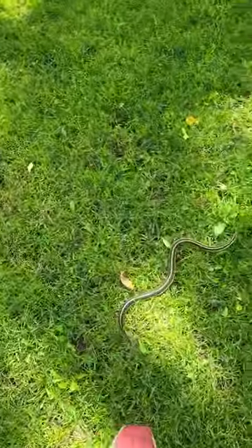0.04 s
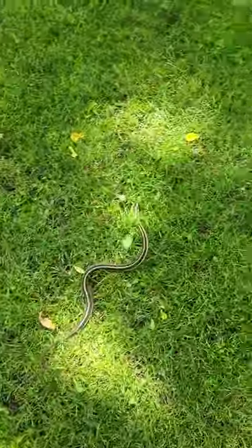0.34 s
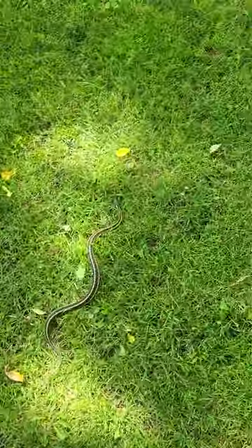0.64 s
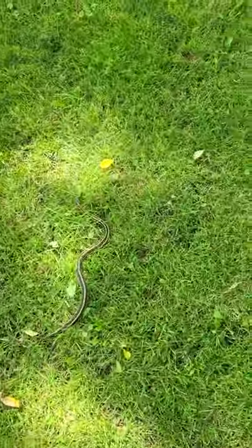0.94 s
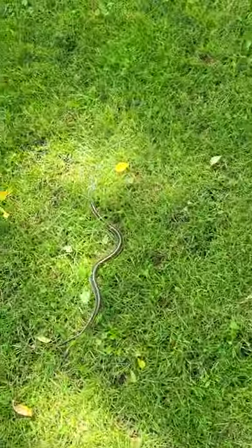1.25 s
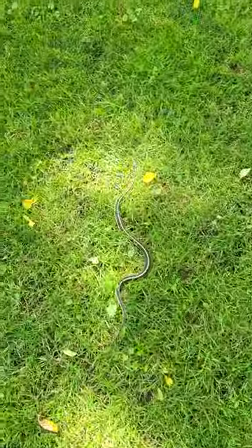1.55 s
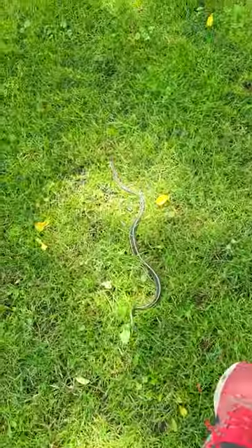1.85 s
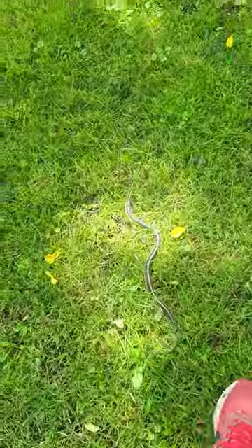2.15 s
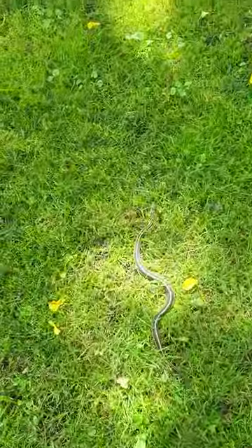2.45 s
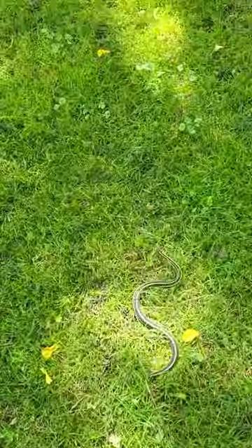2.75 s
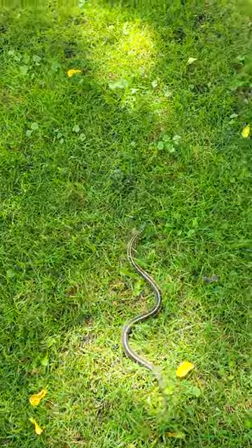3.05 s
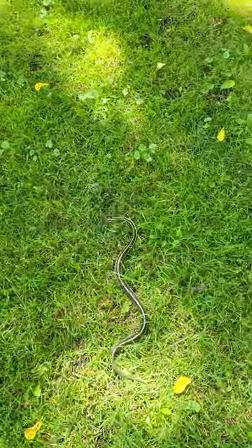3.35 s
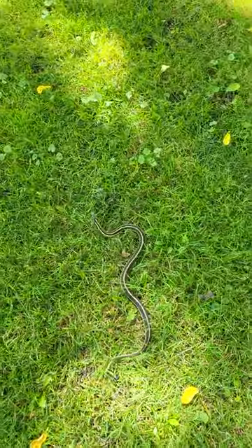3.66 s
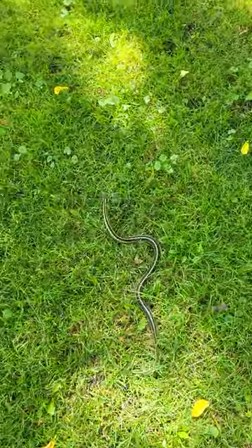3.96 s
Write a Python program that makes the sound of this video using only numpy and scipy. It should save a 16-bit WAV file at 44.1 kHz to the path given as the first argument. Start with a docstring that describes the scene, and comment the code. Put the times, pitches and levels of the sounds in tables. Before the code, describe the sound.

A snake rustles softly through short grass outdoors, followed by light swishing footsteps and snapping stalks. Low wind buffets the microphone, with one sharp tap early on. Faint birds chirp as the slither dies away.

```python
"""A snake slides through short grass, followed on soft steps by someone holding a camera.
From the start wind buffets mainly the left microphone port, over a far outdoor wash and a brief hiss.
Shoes swish through the blades and snap dry stalks; at 0.19 s one sharp tap rings the camera's body.
Faint birds call, then leaves crackle, turf crunches and two twigs crack underfoot. A low hoot follows.
The wash keeps fading, and the slither dies away under a last cluster of calls."""
import sys
import numpy as np
from scipy import signal
from scipy.fft import rfft, irfft, next_fast_len
from scipy.io import wavfile
from scipy.ndimage import uniform_filter1d, map_coordinates

SR = 44100
rng = np.random.default_rng(int(sys.argv[2]) if len(sys.argv) > 2 else 0)


def dump_mix(stems):
    """Bounce the given channels to the path in sys.argv[1] as a 16-bit WAV at rate SR."""
    frames = np.atleast_2d(stems).T  # one column per channel
    limited = np.clip(frames, -1, 1)  # hard clip at full scale
    pcm = np.round(limited * 32767).astype(np.int16)
    wavfile.write(sys.argv[1], SR, pcm)


N = 176400


def amp(db):
    """Decibels to gain."""
    return 10 ** (np.asarray(db) / 20)


def unit(x):
    """Scale to rms 1."""
    return x / np.sqrt(np.mean(x ** 2) + 1e-20)


def clock():
    """Time of each sample in seconds."""
    return np.arange(N) / SR


def along(points, hz):
    """Read (freq_hz, value) points on a log frequency axis."""
    freqs, values = np.transpose(points)
    return np.interp(np.log(hz + 1), np.log(freqs + 1), values)


def curve(points):
    """An automation line through (time_s, value) points."""
    return np.interp(clock(), *np.transpose(points))


def wobble(rate):
    """Smooth random drift, rate knots a second."""
    return map_coordinates(rng.standard_normal(4096), [clock() * rate], mode="mirror")


def filtered(x, response):
    """Filter x by a response given as a function of frequency."""
    size = next_fast_len(N + SR // 2)
    return irfft(rfft(x, size) * response(np.fft.rfftfreq(size, 1 / SR)), size)[..., :N]


def coloured(x, eq):
    """Shape x with an EQ curve, at rms 1."""
    return unit(filtered(x, lambda hz: amp(along(eq, hz))))


def patchy(x, depth_db):
    """Make x flicker with random patches of gain across time and frequency, at rms 1."""
    frames = signal.stft(x, nperseg=1024)[2]
    patches = uniform_filter1d(rng.standard_normal(frames.shape[1:]), size=5, axis=0)
    patches = uniform_filter1d(patches, size=9, axis=1)
    return unit(signal.istft(frames * amp(depth_db * unit(patches)), nperseg=1024)[1][:, :N])


def strike(start_s, t60_s, attack_s):
    """A percussive envelope: quick rise, exponential decay."""
    age = np.maximum(clock() - start_s, 0)
    return (1 - np.exp(-age / attack_s)) * np.exp(-np.log(1000) * age / t60_s)


# Wind ride on the left port, before boost and puffs: time_s, level_db
WIND_RIDE = [(0, -33.5), (.7, -35), (1.25, -35), (1.4, -35), (2.1, -36), (2.4, -31), (2.62, -35),
             (2.78, -36.5), (3.1, -34.5), (3.25, -33.5), (3.5, -31.5), (3.8, -35), (4, -32)]
# Single eddies hitting the left port: centre_s, rise_db
WIND_PUFFS = [(0.032, 1.5), (.195, 12.5), (.515, 5), (.69, 9.5), (0.85, 6), (.928, 6), (1.03, 8.5),
              (1.25, 7), (1.8, 3), (2.038, 7), (2.108, 9.5), (2.355, 9.5), (2.46, 6.5), (2.53, 4.5),
              (2.585, 6), (2.678, 13), (2.9, 5), (3.088, 11), (3.43, 1), (3.88, 2)]
# Rumble of the exposed port: freq_hz, gain_db
EXPOSED_EQ = [(18, -12), (28, -14), (40, 2), (65, 0.5), (100, -7), (140, -19), (200, -40.5), (400, -54),
              (1500, -100)]
# Rumble of the sheltered port: freq_hz, gain_db
SHELTERED_EQ = [(20, -16), (40, -12), (65, 3.5), (100, -2.5), (150, -16.5), (220, -19), (500, -43),
                (1500, -90)]
WIND_BOOST_DB, SHELTERED_DB, PUFF_WIDTH_S = 7.5, -47, 0.014

def wind():
    """Eddies thump the left port in puffs; the right one is sheltered."""
    puffs_db = sum(db * np.exp(-((clock() - s) / PUFF_WIDTH_S) ** 2) for s, db in WIND_PUFFS)
    left_db = curve(WIND_RIDE) + puffs_db + WIND_BOOST_DB + 0.63 * wobble(12)
    left = amp(left_db) * coloured(rng.standard_normal(N), EXPOSED_EQ)
    right = amp(SHELTERED_DB + 1.7 * wobble(3.8)) * coloured(rng.standard_normal(N), SHELTERED_EQ)
    return np.array([left, right])


# Stereo image of the open air: freq_hz, left_right_correlation
AIR_IMAGE = [(100, 1), (290, 1), (640, 0.35), (1400, -0.46), (3000, 0.067)]

def air(eq):
    """Diffuse stereo noise, mono in the bass and wide above."""
    def mid_side_gains(hz):
        angle = np.arccos(along(AIR_IMAGE, hz)) / 2
        return np.array([np.cos(angle), np.sin(angle)])

    mid, side = filtered(rng.standard_normal((2, N)), mid_side_gains)
    return coloured(np.array([mid + side, mid - side]), eq)


# Slow fade of the far wash: time_s, level_db
WASH_RIDE = [(0, -43), (.45, -44.5), (1.1, -45), (1.8, -47), (2.4, -48), (3, -49), (4, -50.5)]
# Soft tone of the wash: freq_hz, gain_db
WASH_EQ = [(100, 3.5), (200, 0), (330, -11.5), (500, -5), (680, -3.5), (850, 0), (1050, -0.5), (1450, -1),
           (2000, -7), (2500, -11.5), (2900, -17), (3700, -18.5), (5000, -24.5), (7000, -35.5),
           (10000, -65)]
# Far midrange hiss at the opening: time_s, level_db
HISS_RIDE = [(0, -45.5), (.15, -49.5), (.4, -50.5), (.58, -51.5), (.7, -67), (1.2, -69), (4, -85)]
# Narrow band of that hiss: freq_hz, gain_db
HISS_EQ = [(100, -45), (500, -36), (700, -5.5), (900, 0), (1120, 1), (1400, 3), (1700, -10), (2300, -31),
           (7000, -60)]
# Steady, bass-heavy bed: freq_hz, gain_db
BED_EQ = [(60, 3), (160, -3), (280, -10), (400, -13.5), (1500, -33), (3000, -31.5), (5000, -34),
          (7000, -30), (9000, -39), (15500, -44)]
BED_DB = -52

def outdoors():
    """A far wash fades and an early hiss drops away over a steady bed."""
    wash = amp(curve(WASH_RIDE) + 0.29 * wobble(16)) * patchy(air(WASH_EQ), depth_db=1.46)
    hiss = amp(curve(HISS_RIDE)) * patchy(air(HISS_EQ), depth_db=4.5)
    bed = amp(BED_DB) * patchy(air(BED_EQ), depth_db=2.0)
    return wash + hiss + bed


def near(pair, mid_share=0.56, lag_s=0.00039):
    """Ground sounds reach both ports, the left one a little later."""
    mid = np.sqrt(mid_share) * pair[0]
    side = np.sqrt(1 - mid_share) * pair[1]
    stereo = np.array([mid + side, mid - side])
    return filtered(stereo, lambda hz: np.exp(-1j * np.pi * lag_s * np.outer([1, -1], hz)))


def blades(eq, flicks_per_s=2500, spread_db=2.5):
    """Tiny flicks of grass blades, mixed equally with smooth rubbing."""
    strength = amp(spread_db * np.minimum(rng.exponential(size=N), 5))
    flicks = (rng.random(N) < flicks_per_s / SR) * strength * rng.standard_normal((2, N))
    rubbing = rng.standard_normal((2, N))
    return coloured(near(unit(flicks) + rubbing), eq)


# Ride of the slither: time_s, level_db
SLITHER_RIDE = [(0, -57.5), (.5, -60.5), (1.1, -64.5), (1.5, -59), (2.1, -60.5), (2.7, -58), (3.1, -59),
                (3.48, -59), (3.7, -68), (4, -80)]
# Bright grass rustle, shared with shoes and stalks: freq_hz, gain_db
GRASS_EQ = [(800, -37), (2000, 2.5), (3000, -2.5), (4200, 2.5), (5800, 1), (7000, -2.5), (8000, -20),
            (9000, -24.5), (12000, -18), (15500, -17)]

def snake():
    """Scales brush the blades without a break."""
    return amp(curve(SLITHER_RIDE) + 1.1 * wobble(16)) * patchy(blades(GRASS_EQ), depth_db=2.5)


# Shoes through the grass: centre_s, half_width_s, swish_db, crisp_db, press_db
FOOTFALLS = [(.02, 0.051, -49, -60.5, -47), (1.395, 0.071, -51, -78.5, -54), (1.68, 0.11, -56, -71.5, -81),
             (1.87, 0.068, -55, -67, -64), (2.31, 0.048, -53.5, -75, -54), (2.46, 0.051, -52, -71, -61),
             (2.56, 0.064, -55.5, -64.5, -55), (2.87, 0.063, -55, -61, -57), (3.1, 0.028, -65, -72, -64)]
# Crisp top, shared with dry leaves: freq_hz, gain_db
CRISP_EQ = [(3000, -25), (6000, 3), (7200, -1), (9000, -7.5), (11000, -2), (13000, -2), (15500, -0.5)]
# Dull body of pressed turf: freq_hz, gain_db
TURF_EQ = [(120, -13), (350, 5), (600, -0.5), (1200, 0.5), (2100, 3.5), (3000, -12.5), (6000, -17),
           (10000, -53)]

def footsteps():
    """Each step swells and fades in three layers: swish, crisp top and pressed turf."""
    out = np.zeros((2, N))
    for layer, eq in enumerate([GRASS_EQ, CRISP_EQ, TURF_EQ]):
        power = sum(amp(levels_db[layer]) ** 2 * np.exp(-((clock() - centre_s) / width_s) ** 2)
                    for centre_s, width_s, *levels_db in FOOTFALLS)
        out += np.sqrt(power) * amp(wobble(60)) * patchy(blades(eq), depth_db=1.5)
    return out


def bursts(cues, eq, attack_s):
    """Breaking fibres: one short burst of coloured noise per cue."""
    envelope = sum(amp(db) * strike(start_s, t60_s, attack_s) for start_s, db, t60_s in cues)
    return envelope * coloured(rng.standard_normal((2, N)), eq)


# Stalk snaps: start_s, level_db, t60_s
STALK_SNAPS = [(.048, -39, 0.016), (1.037, -47, .015), (1.238, -47, .015), (1.271, -44.5, 0.019),
               (1.293, -43, 0.022), (1.328, -44, 0.017), (1.747, -49, .04), (1.763, -44.5, 0.059),
               (2.114, -52, .012), (2.277, -46, 0.019), (2.501, -36, .014), (2.777, -46.5, 0.034),
               (3.73, -50.5, 0.015), (3.765, -53, 0.017)]

def stalks():
    """Dry stalks snap underfoot with a hard, bright edge."""
    return bursts(STALK_SNAPS, GRASS_EQ, attack_s=0.00033)


# Modes of the camera's body: delay_s, pitch_hz, left_db, right_db, t60_s
BODY_MODES = [(0, 7000, -42, -28, .003), (0.0028, 5670, -27, -16, 0.0026), (0, 4360, -41, -15, 0.0019),
              (0.0024, 3400, -43, -25.5, 0.0038), (0.0018, 1446, -0.5, -32, 0.0035),
              (0.00047, 760, -14.5, -47, 0.0093), (0.0019, 333, -23.5, -44, 0.019),
              (0.0017, 151, -23, -48, 0.036)]

def camera_tap(tap_s=0.1897, attack_s=0.00054):
    """One sharp tap rings the camera's body very briefly."""
    out = np.zeros((2, N))
    for delay_s, hz, left_db, right_db, t60_s in BODY_MODES:
        start_s = tap_s + delay_s
        ring = 2 * strike(start_s, t60_s, attack_s) * np.sin(2 * np.pi * hz * (clock() - start_s))
        out += amp([[left_db], [right_db]]) * ring
    return out


def whistle(start_s, length_s, hz):
    """A tone that swells and fades along a pitch curve."""
    progress = np.clip((clock() - start_s) / length_s, 0, 1)
    swell = np.sqrt(np.abs(np.sin(np.pi * progress)))
    return np.sqrt(2) * swell * np.sin(2 * np.pi * np.cumsum(hz) / SR)


# Far chirps: start_s, length_s, start_hz, end_hz, level_db
BIRD_CHIRPS = [(.22, 0.2, 4340, 7800, -67.5), (0.468, 0.062, 5700, 5350, -62.5),
               (0.598, 0.19, 6000, 4620, -71), (2.314, .06, 6000, 7600, -69),
               (3.315, 0.045, 6700, 5700, -63.5), (3.364, 0.047, 4400, 3290, -63),
               (3.395, 0.12, 4100, 4500, -61.5), (3.387, .13, 3340, 3060, -64.5),
               (3.524, 0.075, 4850, 4380, -64), (3.496, 0.1, 2550, 2220, -58)]

def birds(rasp_depth=0.02):
    """Far birds whistle faint glides, made raspy by fast pitch jitter."""
    out = np.zeros(N)
    for start_s, length_s, start_hz, end_hz, db in BIRD_CHIRPS:
        glide_hz = curve([(start_s, start_hz), (start_s + length_s, end_hz)])
        hz = glide_hz * (1 + rasp_depth * wobble(500))
        out += amp(db + 2 * wobble(90)) * whistle(start_s, length_s, hz)
    return out


# Leaf crackles: start_s, level_db, t60_s
LEAF_CRACKLES = [(.423, -60, .05), (1.746, -36.5, .03), (1.758, -46, 0.089), (2.21, -57, .03),
                 (3.11, -58, .04)]

def leaves():
    """Dry leaves crackle underfoot, leaning left."""
    return bursts(LEAF_CRACKLES, CRISP_EQ, attack_s=0.0005) * amp([[1], [-3]])


# Turf crunches: start_s, level_db, t60_s
TURF_CRUNCHES = [(1.385, -31.5, 0.052), (1.396, -36, 0.044), (2.772, -39.5, 0.066), (3.158, -44.5, .08)]

def turf():
    """Turf gives under a sole with a soft-edged crunch."""
    return bursts(TURF_CRUNCHES, TURF_EQ, attack_s=0.0015)


# Twig cracks: start_s, pitch_hz, level_db, t60_s
TWIG_CRACKS = [(2.56, 2114, -31.5, 0.016), (2.78, 2244, -33, 0.014)]

def twigs(attack_s=0.0006, roughness_rad=1.1):
    """Small twigs crack with a rough, pitched click, leaning left."""
    out = np.zeros(N)
    for start_s, hz, db, t60_s in TWIG_CRACKS:
        phase = 2 * np.pi * hz * clock() + roughness_rad * wobble(900)
        out += amp(db) * strike(start_s, t60_s, attack_s) * np.sin(phase)
    return out * amp([[2.5], [-3]])


def hoot(start_s=2.62, length_s=0.24, pitch_hz=276, level_db=-54):
    """A far bird gives one low, fluttering hoot that lifts at its end."""
    lift = curve([(start_s + length_s / 2, 0), (start_s + length_s, 0.08)])
    hz = pitch_hz * (1 + lift + 0.022 * wobble(60))
    return whistle(start_s, length_s, hz) * amp(level_db + 3.8 * wobble(39.14))


# The two ports hear the treble differently: freq_hz, left_minus_right_db
PORT_BALANCE = [(200, 0.5), (550, 2.5), (1000, 0.5), (1400, 1.5), (2000, 1), (2600, 5.5), (3100, -1),
                (4200, -8.5), (5000, -9.5), (5800, -14.5), (6400, -11), (7000, 3.5), (7700, 10),
                (9000, 1.5), (11000, 8.5), (13000, 13.5), (15500, 17)]

def scene():
    """Airborne sounds take each port's colour; wind and the tap act on the camera itself."""
    airborne = outdoors() + snake() + footsteps() + stalks() + birds()
    airborne += leaves() + turf() + twigs() + hoot()
    at_ports = filtered(airborne, lambda hz: amp(np.outer([0.5, -0.5], along(PORT_BALANCE, hz))))
    return at_ports + wind() + camera_tap()


BAND_LIMIT_HZ = 15750

def record(dry):
    """The camera keeps nothing above its band limit."""
    return filtered(dry, lambda hz: hz < BAND_LIMIT_HZ)


dry = scene()
out = record(dry)
dump_mix(out)
```